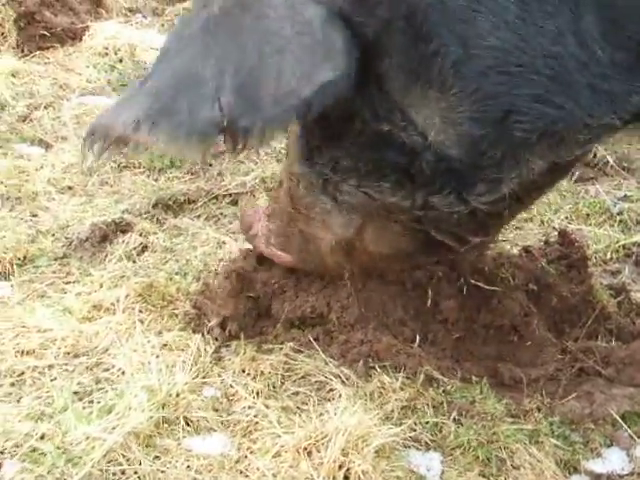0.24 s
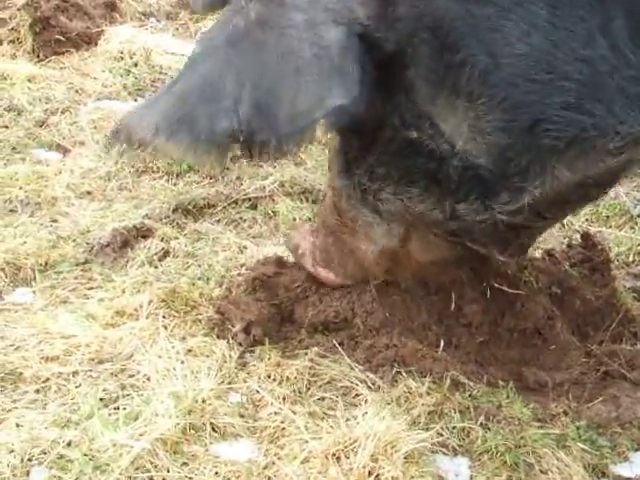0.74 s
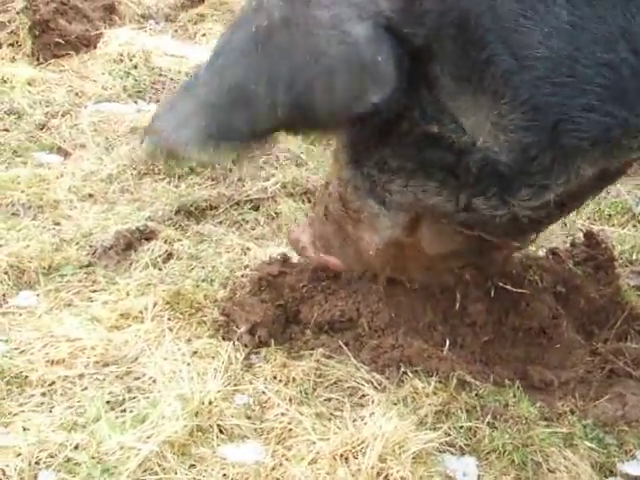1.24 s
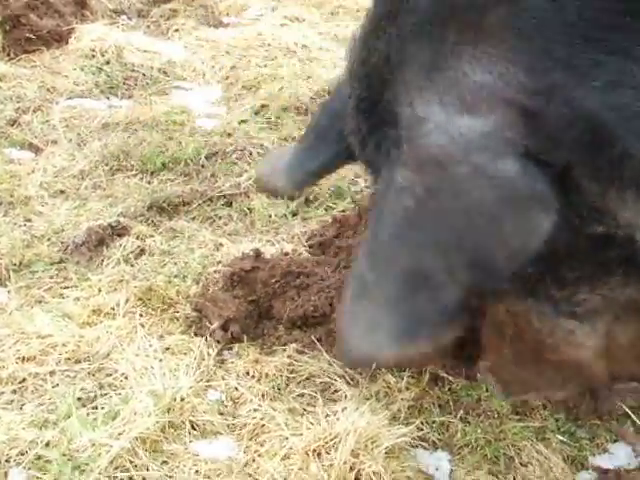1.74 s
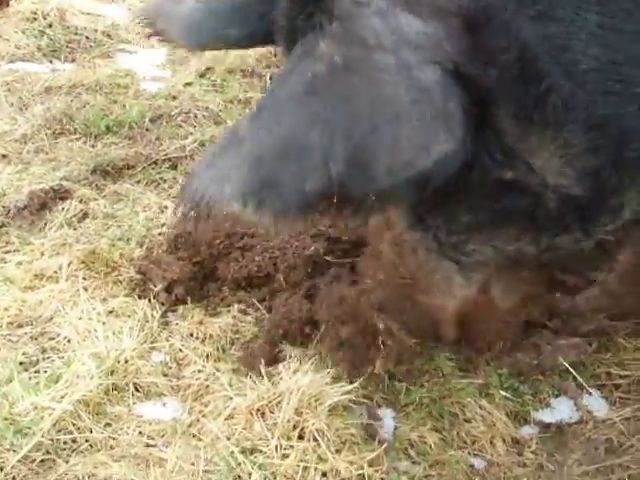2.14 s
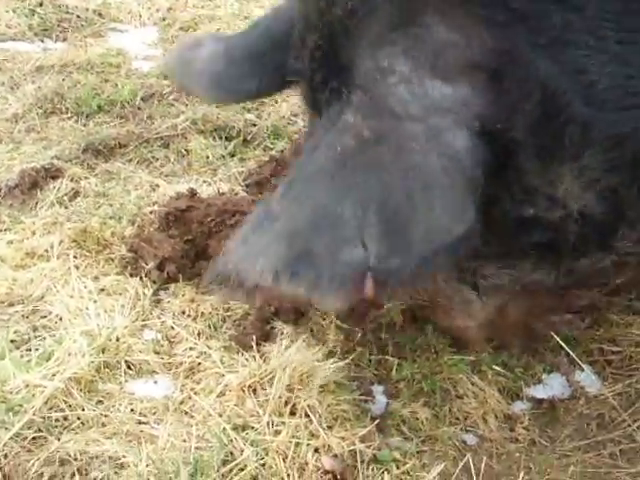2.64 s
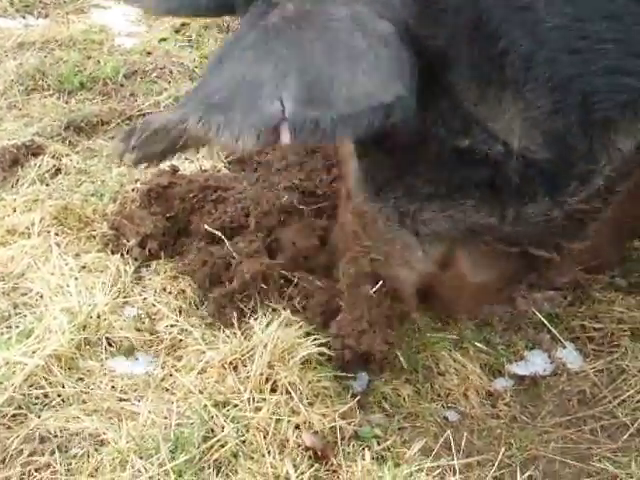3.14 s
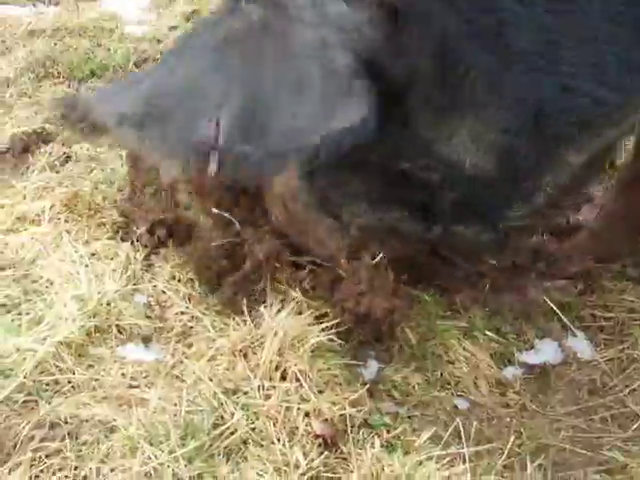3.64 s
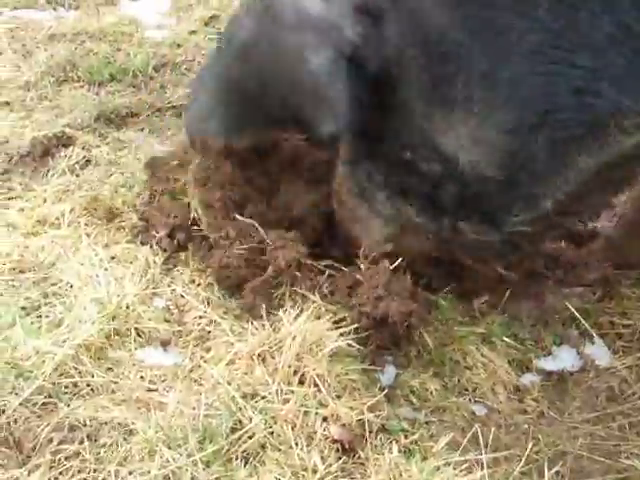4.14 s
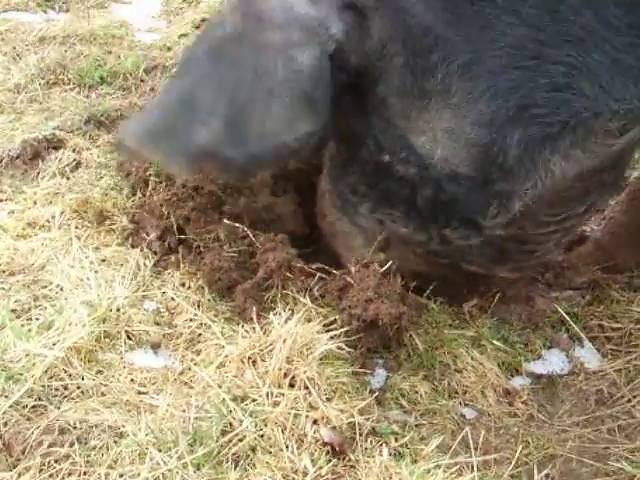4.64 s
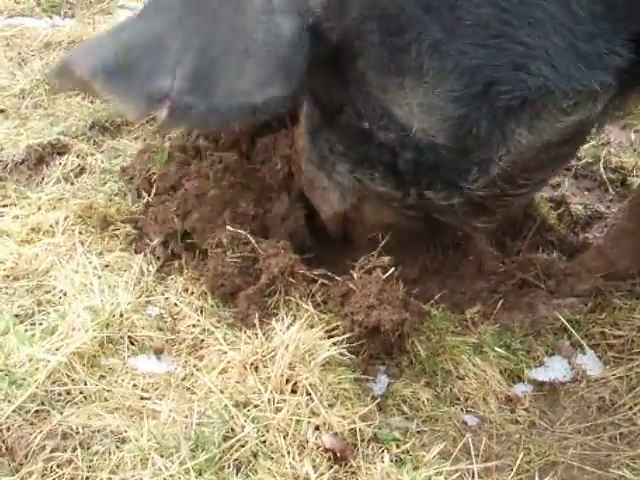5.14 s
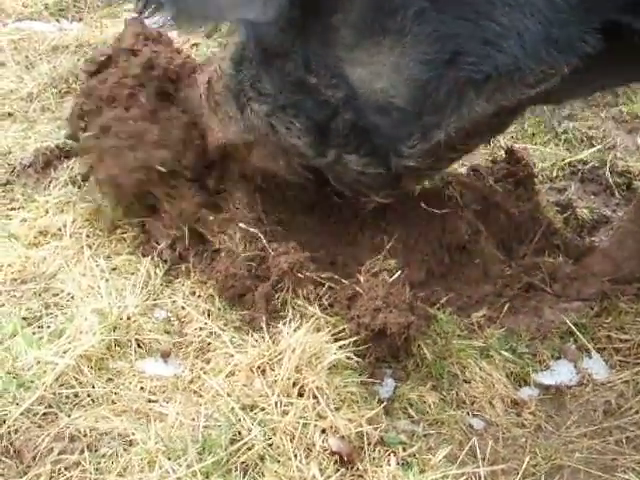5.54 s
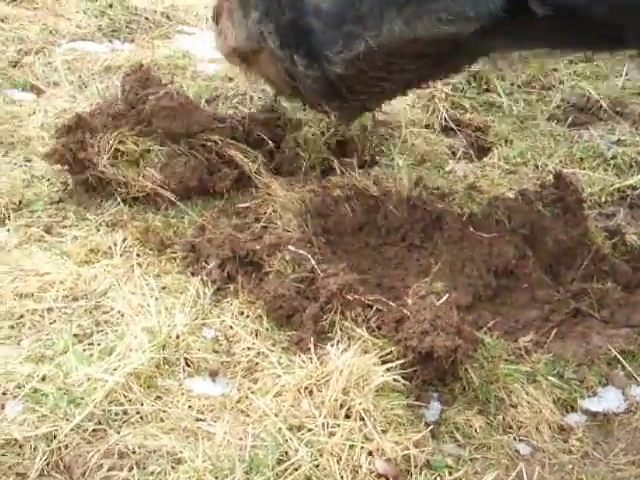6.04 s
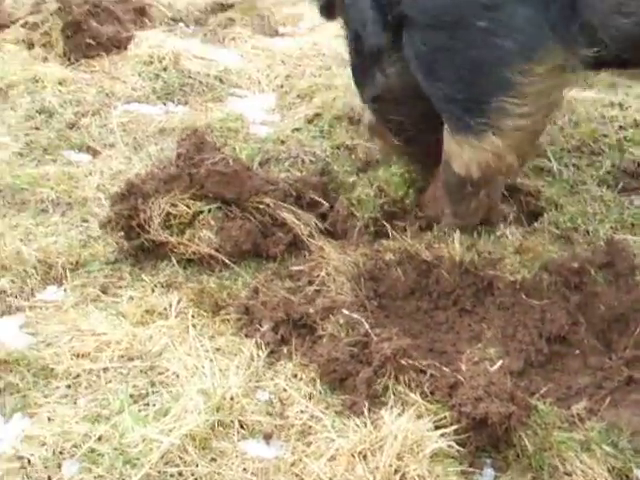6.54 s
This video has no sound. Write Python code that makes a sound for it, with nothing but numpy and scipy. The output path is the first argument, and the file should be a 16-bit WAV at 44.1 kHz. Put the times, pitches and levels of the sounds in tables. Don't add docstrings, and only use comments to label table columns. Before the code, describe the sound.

Close to a small camera microphone in an open pasture, a pig pushes its snout through dry grass and earth. Straw crackles in irregular clumps, roots snap sharply, grit grinds and clods knock dully, with a few soft breaths blown into soil. Distant small birds chirp and whistle, over low wind buffeting, steady hiss and a thin high whine.

```python
import sys
import numpy as np
from scipy import signal
from scipy.fft import rfft, irfft, next_fast_len
from scipy.io import wavfile
from scipy.ndimage import uniform_filter1d, map_coordinates

SR = 44100
rng = np.random.default_rng(int(sys.argv[2]) if len(sys.argv) > 2 else 0)


def volts(x):
    e = np.asarray(x, float) / 20
    return 10 ** e


def waveform_to_disk(signal):
    frames = np.transpose(np.atleast_2d(signal))
    scaled = np.clip(frames, -1, 1) * 32767
    samples = np.round(scaled).astype(np.int16)
    wavfile.write(sys.argv[1], SR, samples)


N = 298557
TIME = np.arange(N) / SR

# full_push_s, hold_s, strength_db, depth_db (soil over straw)
SHOVES = [(0.0, .01, -61, -2), (0.222, .02, -59.5, -0.5), (0.458, 0.057, -63, -2), (0.7, .15, -58.5, -7),
          (0.964, 0.046, -56.5, -5), (1.242, 0.091, -54, -10), (1.42, 0.013, -48, -9),
          (1.946, 0.076, -48, -7.5), (2.194, 0.032, -55, -3.5), (2.443, 0.011, -50, -11),
          (2.558, 0.066, -53, -8), (2.78, 0.11, -49, -5), (2.85, .065, -46, -15),
          (3.192, 0.025, -53.5, -4.5), (3.355, 0.14, -54, -1.5), (3.547, 0.093, -52, -3.5),
          (3.8, 0.035, -68.5, 9), (4.033, 0.018, -53.5, -5), (4.21, 0.047, -60, 5.5),
          (4.272, .05, -49.5, -9.5), (4.432, 0.13, -52.5, -8), (4.805, 0.12, -52, -6.5),
          (4.984, .2, -52, -9), (5.273, 0.076, -75, 16), (5.476, .04, -73, 6.5), (5.73, 0.25, -56, -9.5),
          (6.105, 0.037, -50, -8.5), (6.394, 0.073, -46.5, -14), (6.76, .01, -51, -10)]
# freq_hz, level_db
STRAW_TONE = [(1000, -34.5), (1900, -12.5), (2800, -4), (4000, -3), (6000, 1), (8000, 2.5)]
GRIT_TONE = [(600, -24), (1000, -8), (1500, -7.5), (2100, 2), (3200, -21)]
SOIL_TONE = [(120, -25), (250, -2), (450, -5), (750, 2), (1200, -5), (2000, -34)]
RISE_DB_PER_S, FALL_DB_PER_S = 98.5, 79.5
SOIL_PACE, GRIT_PACE = 0.48, 0.9
GRIT_DB, GRIT_DEPTH = -4.5, 0.72

# time_s, level_db
WIND = [(0.0, -47), (0.11, -74), (0.45, -55), (0.54, -73), (0.58, -52), (0.75, -58.5), (1.19, -56.5),
        (2.68, -58), (2.9, -62), (3.45, -53), (3.56, -67), (3.67, -55), (3.88, -58), (5.07, -56),
        (5.56, -60.5), (5.92, -52.5), (6.71, -56), (6.77, -62)]
# freq_hz, level_db
RUMBLE_TONE = [(8.8, -36), (15, -8), (27, -6), (63, -7.5), (130, -19), (200, -22.5), (260, -35.5),
               (440, -120)]

# start_s, length_s, middle_hz, glide_hz, level_db
SEEPS = [(0.15, 0.026, 4520, 900, -53), (0.394, .018, 4660, 400, -59), (0.49, .035, 4480, -230, -63),
         (0.924, .015, 4490, 254, -55), (1.04, .03, 4650, -700, -62), (1.045, 0.06, 4140, -150, -52.5),
         (1.173, .027, 4480, 275, -53), (1.325, .03, 4560, 100, -54), (1.44, 0.053, 4520, 200, -58),
         (1.6, .038, 4760, -19, -54.5), (1.751, 0.032, 4600, -300, -53.5), (1.89, .022, 5020, -200, -58),
         (4.364, .06, 4700, -100, -60), (4.473, .028, 4570, -200, -51), (4.609, 0.037, 4730, -200, -53),
         (4.645, 0.04, 4700, 200, -57), (4.749, 0.033, 4640, -300, -55), (4.69, .05, 4600, -100, -63),
         (5.005, 0.025, 4800, -100, -57), (5.04, .03, 4600, 100, -62), (5.16, 0.033, 4620, 100, -64),
         (1.265, .02, 4050, 0, -60)]
SLIDES = [(0.416, 0.016, 2780, -570, -60), (0.526, .023, 2700, -600, -58), (0.713, .06, 2450, -570, -64),
          (1.12, 0.022, 3150, 300, -59), (1.14, .04, 2160, -100, -66), (1.265, 0.023, 3330, 202, -64),
          (1.36, .035, 2250, 300, -58), (1.07, 0.026, 3220, -500, -59), (1.34, .015, 2650, -300, -58),
          (4.63, 0.019, 3520, 600, -54.5), (1.905, .025, 3150, -800, -59), (4.56, 0.039, 2870, 200, -61),
          (5.035, 0.041, 2720, 0, -61), (5.165, 0.022, 2740, -400, -59), (6.03, 0.046, 3150, -100, -62),
          (6.15, 0.099, 3100, 2, -66), (1.818, 0.054, 2660, 80, -50), (2.628, 0.039, 2626, -85, -56.5),
          (3.006, .12, 2250, -300, -58), (3.795, .085, 2530, 90, -57.5), (4.241, 0.072, 2900, -900, -56),
          (4.472, .028, 2510, 399, -59), (4.753, .021, 2570, -140, -57), (5.257, .022, 2710, -480, -66),
          (6.332, .069, 2750, 25, -56.5), (6.52, .03, 2450, 1030, -60)]
FALLS = [
    (0.65, .051, 2930, -500, -62),
    (2.323, .02, 2950, 297, -53.5),
    (2.388, 0.024, 2825, -470, -55),
    (2.572, 0.059, 2570, -460, -55.5),
    (4.615, 0.031, 2830, 997, -52.5),
    (5.085, 0.069, 2475, -330, -58),
    (5.644, 0.023, 2800, -300, -56),
    (5.742, .025, 2660, -280, -56.5),
    (5.858, 0.031, 2750, -680, -64),
]
BOWS = [(0.09, 0.064, 2703, -220, -53), (0.16, 0.056, 2590, -350, -66), (0.602, 0.043, 2330, 115, -63),
        (0.782, 0.033, 2350, 154, -63.5), (1.699, 0.086, 2587, 415, -54), (1.925, 0.072, 2850, -1670, -54),
        (3.14, 0.044, 2225, 152, -65), (3.256, 0.067, 2350, 181, -61.5), (3.477, 0.28, 2046, 222, -69),
        (3.672, .055, 2360, 100, -64), (3.85, 0.055, 2310, -450, -60.5), (4.965, 0.056, 2850, -120, -51),
        (5.601, 0.024, 2980, -460, -52.5), (5.676, .07, 2545, -26, -55.5), (6.089, 0.036, 2850, 22, -60)]
NOTE_KINDS = [
    (SEEPS, 0.0028),
    (SLIDES, -0.0062),
    (FALLS, -0.057),
    (BOWS, .072),
]
# flick_s, pitch_factor, lower_db, upper_db
CHIRPS = [(0.943, 1.0, -56, -59), (1.092, 0.97, -56, -57), (1.234, 1.02, -51, -53), (1.379, 1.02, -51, -58),
          (1.508, 1.0, -50, -52), (1.658, 0.99, -51, -54), (1.803, 1.02, -52, -59), (2.083, 0.95, -54, -60),
          (2.218, 0.99, -53, -63), (2.363, 0.95, -53, -63), (2.5, 1.0, -53, -63), (4.41, 0.98, -51, -61),
          (4.531, 0.96, -51, -49), (4.665, 0.97, -51, -51), (4.798, 1.0, -58, -52), (4.95, 0.98, -52, -59),
          (5.206, 0.99, -56, -57)]
# from_flick_s, pitch_hz
LOWER_VOICE = [
    (-.024, 3950),
    (-.006, 3050),
    (0, 3550),
    (.006, 3000),
    (.02, 2600),
]
# from_flick_s, pitch_hz
UPPER_VOICE = [
    [(-.02, 4400), (-.01, 4250), (-.002, 4700)],
    [(.005, 4000), (.018, 3000)],
]
LEAD_DB, TAIL_DB = -5, 1.5
# freq_hz, t60_s
FIELD_ECHO = [(1500, 0.07), (3000, 0.12), (6000, 0.15)]

# start_s, peak_db, ring_hz
ROOTS = [(0.16, -34, 4560), (1.422, -27.5, 1840), (1.4629, -40, 4650), (1.5833, -38, 2180),
         (2.1968, -33.5, 1970), (2.377, -28.5, 6040), (2.4693, -30.5, 6220), (3.0989, -31.5, 4310),
         (3.2363, -31.5, 4540), (4.3251, -32.5, 1980), (4.377, -33, 3540), (4.4469, -26.5, 4700),
         (4.5251, -36, 2980), (4.5455, -16, 4930), (4.6196, -37.5, 4540), (6.4315, -29, 4270),
         (6.437, -27.5, 3500), (5.532, -27, 5520), (1.505, -36, 5800), (1.938, -40, 6000),
         (1.951, -39, 6000), (1.987, -32, 3600), (2.019, -34, 4280), (2.062, -38, 4500),
         (2.832, -32.5, 2960), (2.883, -35, 3630), (3.0045, -33, 7100), (3.5887, -36, 3520),
         (3.6391, -37, 3970), (4.434, -36, 5000), (6.6194, -34, 2300)]
STALKS = [(0.9763, -36, 2880), (1.1765, -37, 2580), (1.2084, -21.5, 3800), (1.4884, -35, 3790),
          (2.0158, -33.5, 4700), (2.2273, -25, 7620), (2.4447, -34.5, 2080), (2.9625, -30.5, 2950),
          (3.0085, -28, 3170), (3.5723, -37.5, 2040), (4.2578, -34, 2830), (4.4512, -29.5, 4460),
          (6.279, -31.5, 7100), (5.4097, -28, 6260), (6.5006, -30.5, 7400), (6.5894, -35, 3100)]
STRAWS = [(0.225, -26, 1346), (0.2544, -42, 6850), (0.306, -24, 2810), (1.1096, -27, 5580),
          (1.2386, -18, 1970), (1.4015, -27, 3830), (2.2762, -32.5, 3630), (2.2928, -21, 2780),
          (2.3094, -29, 2090), (2.5368, -24, 6280), (2.7581, -27.5, 1140), (2.7926, -29, 1140),
          (2.7714, -28, 1130), (2.7657, -28.5, 1310), (2.9963, -29, 5340), (3.0171, -21, 3270),
          (3.1197, -29, 8050), (3.3167, -27.5, 5770), (3.4582, -32.5, 5720), (4.4963, -16.5, 1930),
          (4.547, -22, 1810), (4.8984, -28.5, 7230), (5.1866, -30, 3040), (5.8006, -26.5, 5580),
          (5.9075, -29.5, 3550), (6.5735, -24, 3600)]
CRACKS = [
    (1.9658, -27, 5900),
    (1.978, -25, 5500),
    (1.9998, -24.5, 3480),
    (2.0484, -23.5, 4630),
    (2.0768, -15.5, 3080),
    (2.8628, -25, 5400),
    (2.9074, -17, 3380),
    (3.0345, -26.5, 3930),
    (4.9063, -24, 3550),
]
SPLINTERS = [(0.1664, -37, 2650), (0.2014, -33.5, 2390), (0.2423, -28.5, 1870), (0.5018, -33, 2420),
             (0.7332, -41, 2360), (0.841, -31.5, 6740), (1.0136, -36, 4410), (1.293, -38, 4030),
             (1.3099, -32, 3800), (2.1251, -37, 2050), (2.1304, -30, 2930), (2.4937, -32, 3380),
             (2.8254, -32, 3300), (2.9214, -33, 6800), (3.1418, -39, 2120), (3.1757, -36, 3360),
             (3.4481, -36, 3500), (3.7202, -36, 2210), (3.8107, -33, 2500), (4.1026, -32, 6100),
             (4.1114, -39, 3120), (4.2218, -34, 5380), (4.2343, -33, 3120), (4.4674, -27, 2160),
             (4.7704, -31.5, 4420), (5.0054, -33, 2580), (5.1013, -36, 2500), (5.1522, -36, 4650),
             (5.466, -34, 5900), (5.4954, -39, 3790), (5.6264, -28, 2680), (5.7424, -31, 3980),
             (5.8336, -36, 4020), (5.9114, -32, 3370), (5.9534, -36, 3460), (5.9903, -37, 2500),
             (6.0074, -34, 6940), (6.0254, -33, 3890), (6.1873, -34, 3740), (6.3255, -31, 7070),
             (6.5231, -36, 4030), (6.5344, -35, 2490), (6.6732, -33, 7400)]
# events, crack_db (over the ring), t60_s, edge (low edge of the crack over ring pitch)
BREAKS = [
    (ROOTS, 4.9, 0.016, 1.1),
    (STALKS, 0.22, 0.025, 1.01),
    (STRAWS, -8, 0.015, 0.8),
    (CRACKS, 4.5, 0.01, 0.13),
    (SPLINTERS, -3, 0.011, .9),
]

# start_s, length_s, level_db, centre_hz
SCRAPES = [(.228, .025, -49, 2000), (.31, 0.022, -49, 2800), (0.519, .035, -50, 2500),
           (0.641, 0.013, -52, 900), (1.454, 0.018, -46, 2100), (2.12, .02, -47, 2200),
           (2.755, .025, -45.5, 5500), (3.007, 0.0074, -37, 3000), (3.802, 0.062, -55, 450),
           (4.032, .04, -53, 750), (4.12, 0.073, -53, 700), (4.818, 0.027, -52, 600),
           (5.226, 0.028, -56, 550), (2.765, 0.012, -41, 7600), (3.17, .03, -48.5, 2800),
           (5.604, 0.041, -49, 2100), (5.722, .04, -54, 890), (6.097, .03, -49, 4000),
           (6.243, .03, -48, 2600), (6.422, 0.026, -41.5, 4200), (6.455, 0.024, -45, 5000)]
SCRAPE_OCTAVES = 1
# start_s, peak_db, pitch_hz
CLODS = [(0.645, -39.5, 1000), (0.978, -36, 1244), (1.46, -37, 770), (1.998, -33.5, 840), (2.047, -48, 400),
         (2.447, -38, 421), (2.818, -36, 647), (3.062, -40, 700), (3.209, -39.5, 527), (3.848, -39.5, 420),
         (4.034, -38, 945), (4.047, -34, 666), (4.136, -37.5, 680), (4.153, -34, 718), (4.192, -35, 614),
         (4.446, -39, 694), (4.829, -42, 674), (5.05, -36, 734), (5.234, -35.5, 582), (5.749, -37, 640),
         (6.439, -35, 906), (6.63, -35, 698)]
CLOD_CYCLES = 41
# start_s, length_s, level_db
SNUFFS = [
    (3.302, 0.61, -59),
    (4.068, 0.14, -55),
    (5.896, 0.28, -46),
    (6.29, 0.18, -53),
]
# freq_hz, level_db
NOSTRIL_TONE = [(150, -12), (300, 3.5), (700, -9.5), (1300, -25), (2900, -3), (5000, -14), (8000, -10)]

# freq_hz, level_db
HISS_TONE = [(71, -34.5), (120, -3), (207, 0.5), (284, 3), (1180, -4.5), (2940, -1), (7460, -6),
             (8000, -4.5)]
# freq_hz, level_db
ROLL_OFF = [(7600, 0), (8000, -6.5), (8300, -10), (8700, -21.5), (9200, -52), (9600, -100)]
SCAN_HZ, FLIP_HZ, SAMPLING_HZ = 7867.1, 15.0, 16000


def unit(x):
    return x / np.sqrt(np.mean(x ** 2) + 1e-20)


def along(points, hz):
    f, v = np.transpose(points)
    return np.interp(np.log(hz + 1), np.log(f + 1), v)


def wobble(rate):
    return map_coordinates(rng.standard_normal(int(N * rate / SR) + 4), [TIME * rate])


def coloured(x, points):
    m = next_fast_len(N + 8192)
    gain = volts(along(points, np.fft.rfftfreq(m, 1 / SR)))
    return irfft(rfft(x, m) * gain, m)[..., :N]


def grains(count, centre_hz, spread, cycles, uneven_db):
    u = rng.random((count, 2))
    g = rng.standard_normal((count, 1))
    t = np.arange(300) / SR
    hz = np.clip(centre_hz * np.exp(spread * g), 150, 9000)
    size = volts(-uneven_db * np.log(1.01 - u[:, 1:]))
    ticks = size * np.sin(2 * np.pi * hz * t) * np.exp(-t * hz / cycles)
    at = (u[:, :1] * N).astype(int) + np.arange(len(t))
    return unit(np.bincount(at.ravel(), ticks.ravel(), minlength=N)[:N])


def pushed(strength_db, pace):
    s, hold = np.transpose(SHOVES)[:2, :, None]
    before, after = np.maximum(s - TIME, 0), np.maximum(TIME - s - np.abs(hold), 0)
    loss_db = RISE_DB_PER_S * before + FALL_DB_PER_S * after
    return np.max(strength_db[:, None] - pace * loss_db, axis=0)


def rooting():
    push_db, depth_db = np.transpose(SHOVES)[2:]
    straw_db = pushed(push_db, 0.91)
    soil_db = pushed(push_db + depth_db, SOIL_PACE)
    grit_db = pushed(push_db + GRIT_DB + GRIT_DEPTH * depth_db, GRIT_PACE)
    clumps, bed = wobble(160), rng.standard_normal((3, N))

    ticks = grains(count=5000, centre_hz=3800, spread=0.5, cycles=2.0, uneven_db=1.5) + 0.66 * bed[0]
    sharp = grains(count=500, centre_hz=5500, spread=0.27, cycles=1.0, uneven_db=1.5)
    stones = grains(count=3000, centre_hz=1490, spread=0.31, cycles=1.6, uneven_db=3.0) + 0.6 * bed[1]
    lumps = grains(count=3000, centre_hz=588, spread=0.5, cycles=1.2, uneven_db=2.2) + 1.0 * bed[2]

    straw = unit(volts(1.5 * clumps) * coloured(ticks + 0.3 * sharp, STRAW_TONE))
    grit = unit(volts(2.7 * clumps) * coloured(stones, GRIT_TONE))
    soil = unit(volts(1.2 * clumps + 1.5 * wobble(30)) * coloured(lumps, SOIL_TONE))
    return volts(straw_db + 3.5) * straw + volts(grit_db + 5.0) * grit + volts(soil_db + 0.3) * soil


def wind():
    s, db = np.transpose(WIND)
    level_db = np.interp(TIME, s, db)
    buffeting = volts(2.7 * wobble(12)) * coloured(rng.standard_normal(N), RUMBLE_TONE)
    return volts(level_db + 0.5) * unit(buffeting)


def add_whistle(out, s, hz, db, waver):
    u = np.linspace(0, 1, len(hz))
    start = round(s * SR)
    phase = 2 * np.pi * np.cumsum(hz * (1 + waver[start:start + len(hz)])) / SR
    swell = np.abs(np.sin(np.pi * u ** 0.85)) ** 0.2
    out[start:][:len(u)] += volts(db + 7.5) * swell * np.sin(phase)


def birds():
    out, waver = np.zeros(N + SR), 0.009 * wobble(120)
    for notes, bow in NOTE_KINDS:
        for s, length, hz, glide_hz, db in notes:
            u = np.linspace(-1, 1, round(length * SR))
            add_whistle(out, s, hz * (1 - bow * u ** 2) + glide_hz * u / 2, db, waver)

    for s, pitch, lower_db, upper_db in CHIRPS:
        lead, tail = UPPER_VOICE
        strokes = [(LOWER_VOICE, lower_db), (lead, upper_db + LEAD_DB), (tail, upper_db + TAIL_DB)]
        for stroke, db in strokes:
            at, hz = np.transpose(stroke)
            glide = np.interp(np.arange(at[0], at[-1], 1 / SR), at, hz)
            add_whistle(out, s + at[0], pitch * uniform_filter1d(glide, size=50), db - 0.7, waver)

    flutter = volts(1.7 * wobble(90) - 0.7)
    song = coloured(out[:N], [(3600, 0), (4500, -4)]) * flutter
    hz, t, z = signal.stft(rng.standard_normal(SR // 2), SR, nperseg=256)
    decay = volts(-60 * t / along(FIELD_ECHO, hz)[:, None])
    echo = signal.istft(z * decay, SR, nperseg=256)[1]
    return song + volts(-3.0) * signal.fftconvolve(song, echo / np.linalg.norm(echo))[:N]


def snaps():
    out, t = np.zeros(N + SR), np.arange(SR // 25) / SR
    ring_rise = 1 - np.exp(-(t / 0.0012) ** 3)
    pulse = np.exp(-((t - 0.0009) * 13000) ** 2)
    first_give = np.gradient(np.diff(pulse, n=2, append=[0, 0]))
    for events, crack_db, t60, edge in BREAKS:
        for s, db, hz in events:
            noise = rng.standard_normal((2, len(t)))
            drift = np.cumsum(uniform_filter1d(noise[0], 12)) * (hz / 4200) ** 2 * 0.3
            ring = np.sin(2 * np.pi * hz * t + drift) * volts(-60 * t / t60)
            rough = np.tanh(2 * noise[1])
            rough = rough - uniform_filter1d(rough, size=int(SR / (hz * edge)))
            crack = (t > 0.0008) * volts(crack_db + 9.5 - 60 * t / (0.33 * t60)) * rough
            crack = crack + volts(crack_db + 15.5) * first_give
            out[round(s * SR):][:len(t)] += volts(db + 1.5) * (ring_rise * ring + crack)
    return coloured(out[:N], [(150, -30.5), (600, -3), (1200, 0.0), (6500, -2), (8000, 0)])


def scrapes():
    out, size = np.zeros(N + SR), SR // 10
    t, freq_hz = np.arange(size) / SR, np.fft.rfftfreq(size, 1 / SR)
    for s, length, db, hz in SCRAPES:
        band = np.exp(-(np.log2((freq_hz + 1) / hz) / SCRAPE_OCTAVES) ** 2)
        noise = rng.standard_normal((2, size))
        judder = volts(1.2 * unit(uniform_filter1d(noise[1], size=90)))
        rough = judder * irfft(rfft(noise[0]) * band, size)
        swell = np.sin(np.pi * np.clip(t / length, 0, 1))
        out[round(s * SR):][:size] += volts(db) * swell * unit(rough)
    return out[:N]


def clods():
    out, t = np.zeros(N + SR), np.arange(SR // 8) / SR
    soft_start = 1 - np.exp(-t / 0.00068)
    for s, db, hz in CLODS:
        drift = np.cumsum(uniform_filter1d(rng.standard_normal(len(t)), 40)) * 0.17
        knock = np.sin(2 * np.pi * hz * t + drift)
        knock = knock + 0.23 * np.sin(2 * np.pi * 2.3 * hz * t - drift)
        decay = volts(db - 2.5 - 60 * t * hz / CLOD_CYCLES)
        out[round(s * SR):][:len(t)] += decay * soft_start * knock
    return out[:N]


def snuffles():
    swell = np.zeros(N)
    for s, length, db in SNUFFS:
        swell += volts(db) * np.sin(np.pi * np.clip((TIME - s) / length, 0, 1))
    return swell * unit(volts(2.4 * wobble(40)) * coloured(rng.standard_normal(N), NOSTRIL_TONE))


def scene():
    pig = rooting() + snaps() + scrapes() + clods() + snuffles()
    return (pig + wind() + birds())[None]


def roll_off(x):
    return signal.sosfilt(signal.butter(12, 9220, fs=SR, output="sos"), x)


def record(dry):
    hiss = volts(-49.0) * unit(coloured(rng.standard_normal(N), HISS_TONE))
    flips = np.tanh(12 * np.sin(2 * np.pi * FLIP_HZ * TIME))
    whine = volts(-55.5) * flips * np.sin(2 * np.pi * SCAN_HZ * TIME)
    band = coloured(dry + hiss + whine, [(7950, 0), (8050, -120)])
    mirrored = band * (1 + 2 * np.cos(2 * np.pi * SAMPLING_HZ * TIME))
    return roll_off(coloured(mirrored, ROLL_OFF) - 0.0024)


dry = scene()
out = record(dry)
waveform_to_disk(out)
```